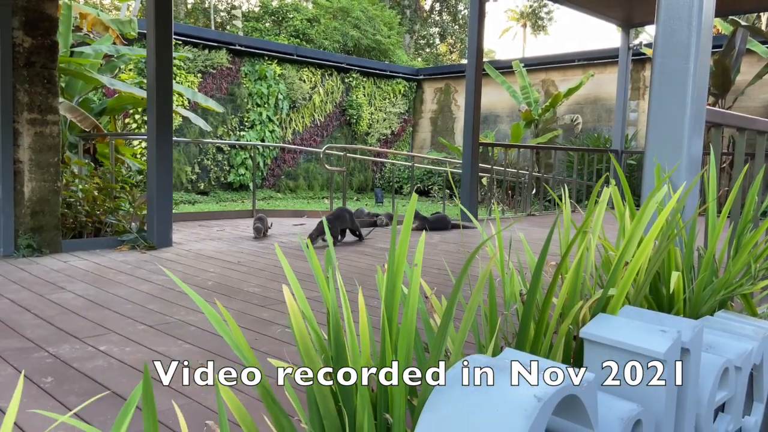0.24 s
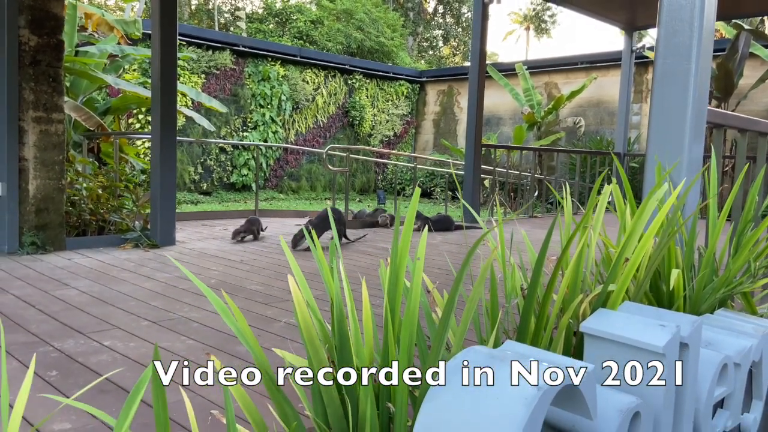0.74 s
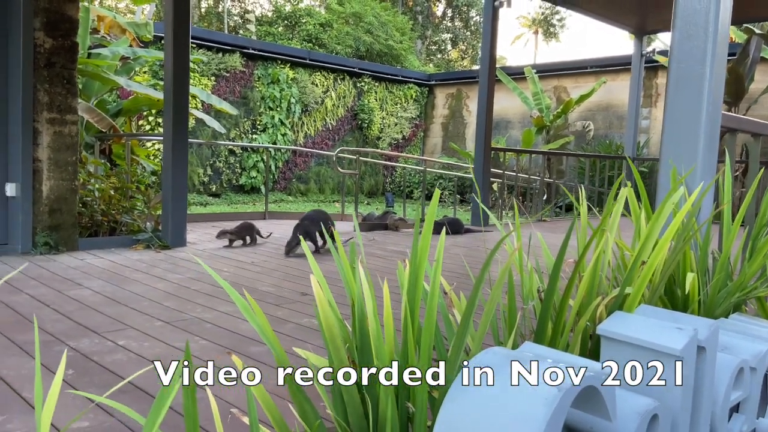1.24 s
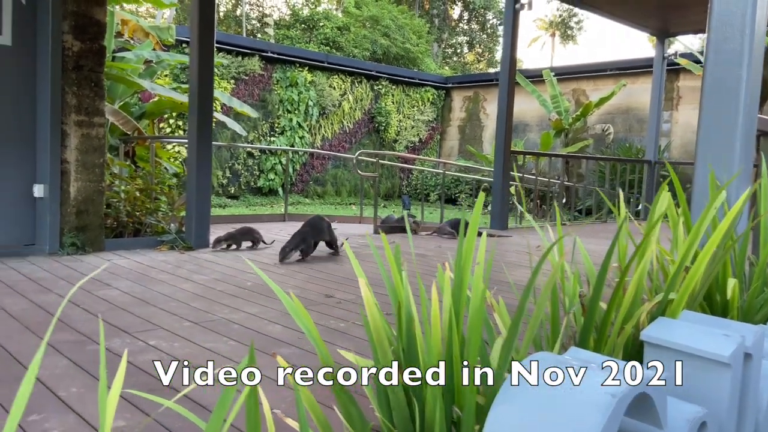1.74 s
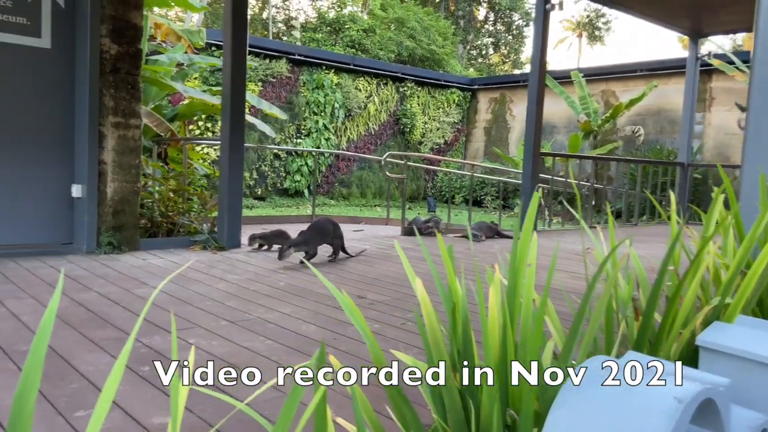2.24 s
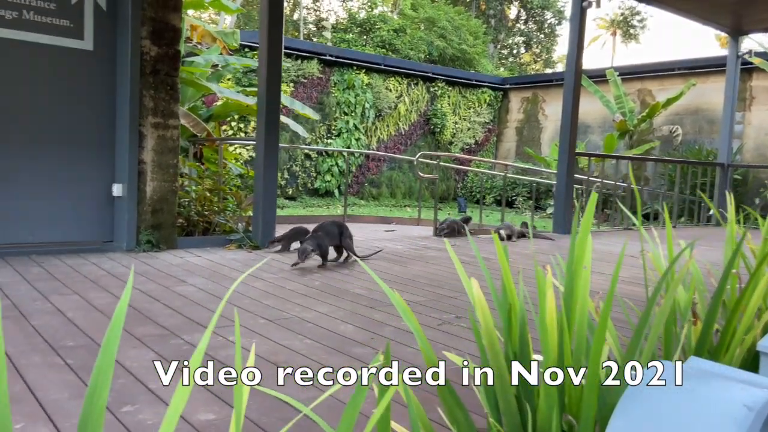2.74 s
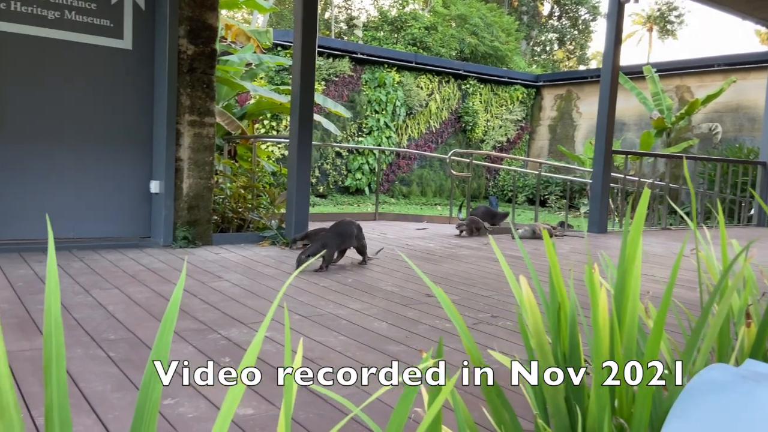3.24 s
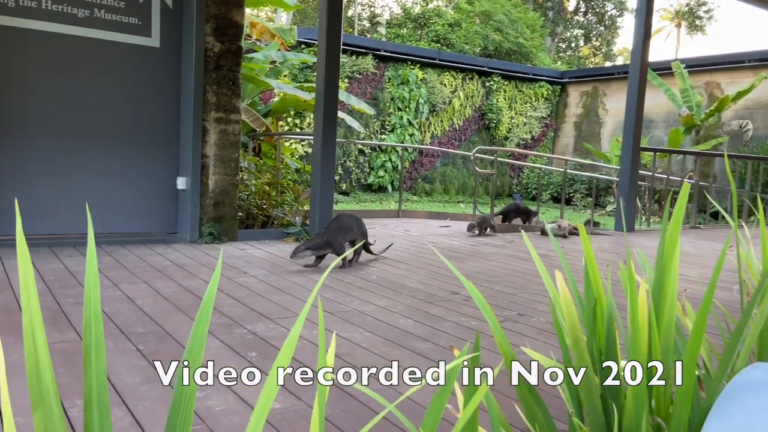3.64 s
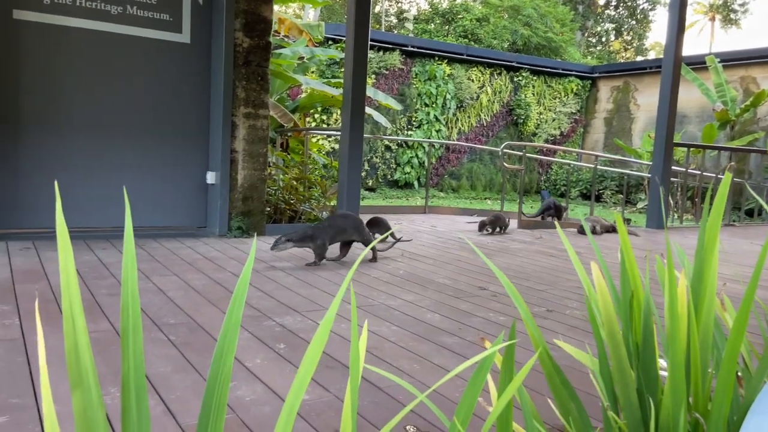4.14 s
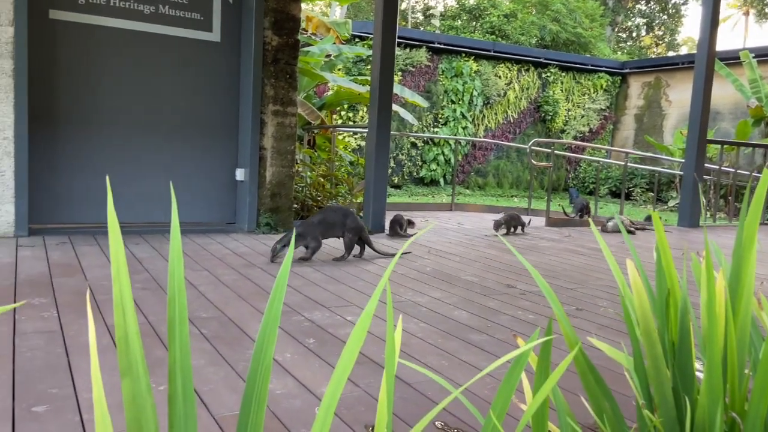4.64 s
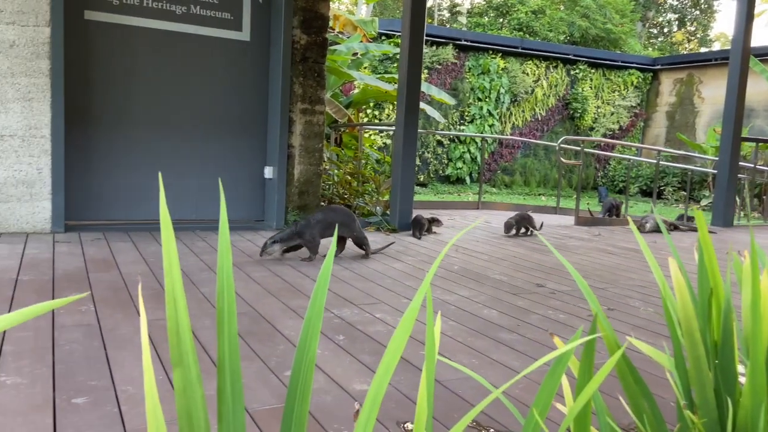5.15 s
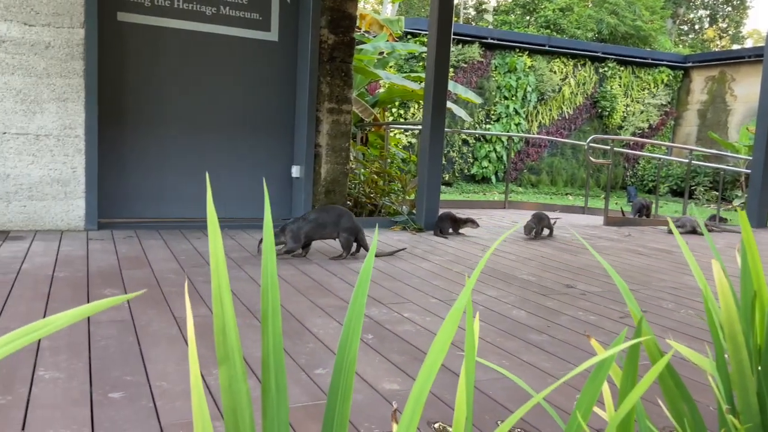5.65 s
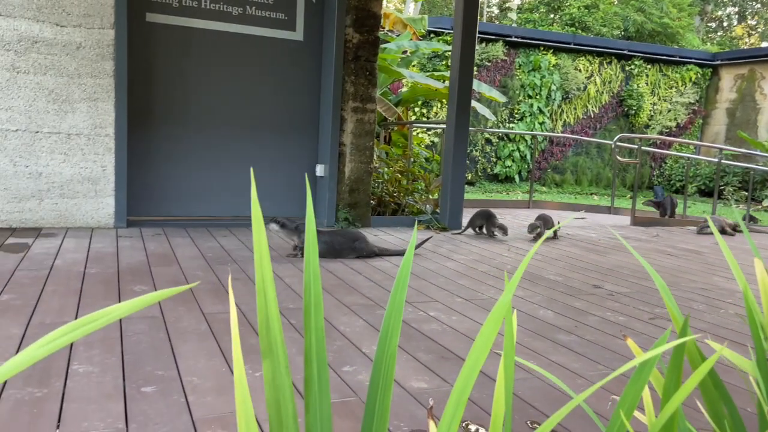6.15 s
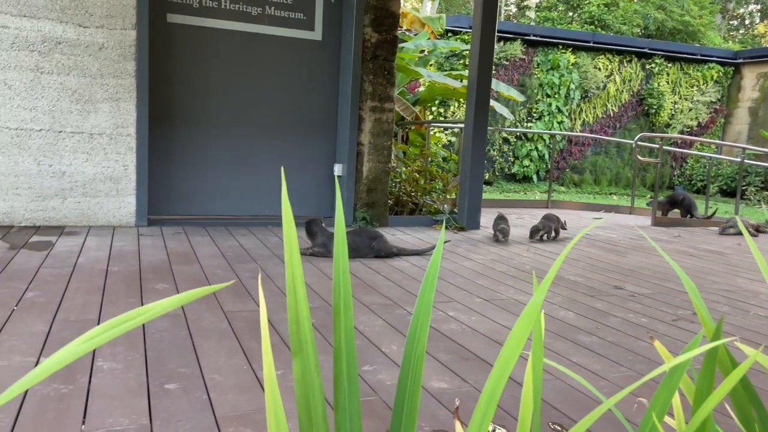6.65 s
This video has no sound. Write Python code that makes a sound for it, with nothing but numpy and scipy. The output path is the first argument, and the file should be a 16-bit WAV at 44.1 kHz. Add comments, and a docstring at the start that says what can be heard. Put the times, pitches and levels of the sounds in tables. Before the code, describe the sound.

On a roofed wooden deck in a garden, a low steady hum of machinery and traffic lies under a soft wash and a faint, very high insect hiss. From 0.1 to 0.8 seconds otters give small chirps and low squeaks, ending in a raspy one. At 1.1 a body flops dully on the boards, with a rising yelp and a falling whistle, then more squeaks to 1.7. A lull follows, with light claw ticks at 2.0 and 2.75 and a lone insect swelling until about 3.3. A tiny squeak and rustle come at 3.0. At 3.5 a softer bump starts a busy cluster of raspy squeaks. Clear falling chirps follow at 4.0, 4.35, 4.85 and 5.15, and a sharp one at 5.5. A distant two-tone horn sounds at 5.6, with a soft shuffle around 5.8. Faint thin peeps continue to 6.3, and a last clear chirp comes at 6.8. Short echoes surround the calls.

```python
"""A family of otters calls on a roofed wooden deck: gliding sines with an octave, from clear chirps to raspy squeaks.
Noise bursts make claw ticks, and ring damped board modes as bodies flop. Walls and roof return decaying noise echoes.
Swelling noise makes a brief rustle and a soft shuffle; a far two-tone horn sounds once, as flickering overtones.
Behind lie coloured noises: a hum of machinery and traffic, a garden wash and a high insect chorus.
One insect hisses off to the side, a wavering high tone."""
import sys
import numpy as np
from scipy import signal
from scipy.fft import rfft, irfft, next_fast_len
from scipy.io import wavfile

SR = 44100
rng = np.random.default_rng(int(sys.argv[2]) if len(sys.argv) > 2 else 0)


def file_out(sig):
    """Save sig as 16-bit WAV at sys.argv[1]."""
    # one column per channel
    cols = np.atleast_2d(sig).T
    # limit, then scale
    lim = np.clip(cols, -1, 1)
    pcm = np.round(lim * 32767).astype(np.int16)
    wavfile.write(sys.argv[1], SR, pcm)


N = 303849


def from_db(db):
    """dB to gain."""
    return 10 ** (np.asarray(db) / 20)


def rms_one(x):
    """Scale to rms 1."""
    return x / np.sqrt(np.mean(x ** 2) + 1e-20)


def level_curve(rows):
    """A (seconds, dB) table as one gain per sample."""
    seconds, db = np.transpose(rows)
    return from_db(np.interp(np.arange(N) / SR, seconds, db))


def at_hz(points, hz):
    """Read a (Hz, dB) table on a log-frequency axis."""
    table_hz, db = np.transpose(points)
    return np.interp(np.log(hz), np.log(table_hz), db)


def drift(rate_hz, size):
    """Random wander of rms 1: noise through a two-pole low-pass at about rate_hz."""
    settle = 8000   # samples dropped while the filter settles
    r = np.exp(-2 * np.pi * rate_hz / SR)
    slow = signal.lfilter([1], [1, -2 * r, r * r], rng.standard_normal(size + settle))
    return rms_one(slow[settle:])


def coloured(spectrum, patchy_db):
    """Noise of rms 1 with the given spectrum; its level flickers by patchy_db."""
    size = next_fast_len(N)
    bin_hz = np.arange(size // 2 + 1) * SR / size + 1   # the 1 keeps the log finite
    shaped = rfft(rng.standard_normal(size)) * from_db(at_hz(spectrum, bin_hz))
    noise = irfft(shaped, size)[:N]
    return rms_one(noise * from_db(patchy_db * drift(26.0, N)))


def band_noise(noise, low_hz, high_hz):
    """Keep a gently sloped band of the noise."""
    return signal.sosfilt(signal.butter(1, [low_hz, high_hz], "band", fs=SR, output="sos"), noise)


def swell(peak_s, peak_db, width_s):
    """A smooth rise and fall of gain, 6 dB down at width_s from the peak."""
    return from_db(peak_db - 6 * ((np.arange(N) / SR - peak_s) / width_s) ** 2)


def placed(x, pan_db):
    """One source to two ears: a level split, and the right ear a little late."""
    lag_s = .00004
    n = np.arange(len(x))
    late = np.interp(n - lag_s * SR, n, x)
    return np.array([x * from_db(pan_db / 2), late * from_db(-pan_db / 2)])


# Hum spectrum. Each row: frequency in Hz, relative density in dB per Hz.
HUM_COLOUR = [(18, -56), (30, -20.5), (46, -10), (59, -4), (75, -5), (92, -5), (108, 3), (119, 0),
              (145, -10), (166, -9.5), (184, -8), (193, -11), (211, -13), (276, -30), (320, -31),
              (420, -51), (700, -120)]
# Hum fader. Each row: time in seconds, level in dB.
HUM_LEVEL = [(0, -33), (1.1, -32.5), (1.8, -33.5), (3.2, -31.5), (3.8, -31), (6.2, -31), (6.89, -32.5)]


def hum():
    """Distant machinery and traffic: low noise shaped into broad peaks."""
    return level_curve(HUM_LEVEL) * coloured(HUM_COLOUR, patchy_db=0.58)


# Wash spectrum. Each row: frequency in Hz, relative density in dB per Hz.
WASH_COLOUR = [(150, -11), (260, -2.5), (309, -6.5), (402, -7), (521, -9.5), (577, -10), (707, -9.5),
               (878, -10), (1320, -18.5), (2880, -23.5), (5530, -35), (7390, -35), (8300, -43),
               (10800, -122), (18300, -120)]
WASH_DB = -51.5


def wash():
    """Far traffic and leaves: steady noise, weaker towards the treble."""
    return from_db(WASH_DB) * coloured(WASH_COLOUR, patchy_db=.3)


# Insect chorus spectrum. Each row: frequency in Hz, relative density in dB per Hz.
CHORUS_COLOUR = [(9000, -79), (9600, -22), (10200, -11.5), (10700, -6), (11100, 2), (11700, -4.5),
                 (12200, -13), (12500, -37), (13500, -49), (16000, -68)]
# Chorus fader. Each row: time in seconds, level in dB.
CHORUS_LEVEL = [(0.0, -66), (0.23, -69), (3.56, -68.5), (3.66, -70.5), (6.21, -69), (6.46, -72.5),
                (6.8, -68)]


def chorus():
    """Insects blend into a narrow band of high hiss."""
    return level_curve(CHORUS_LEVEL) * coloured(CHORUS_COLOUR, patchy_db=.4)


# Spectrum of the wide layer. Each row: frequency in Hz, relative density in dB per Hz.
WIDE_COLOUR = [(18, -50), (30, -26), (48, -27), (74, -14.5), (106, 0), (188, -10.5), (410, -22), (873, -19),
               (1410, -24.5), (3150, -38.5), (4360, -43.5), (6050, -47.5), (7400, -51.5), (11100, -48),
               (12200, -59.5), (15900, -50.5), (22000, -120)]
WIDE_DB = -46.5


def wide_wash():
    """The wide part of the garden: one noise with opposite sign in the two ears."""
    return from_db(WIDE_DB) * coloured(WIDE_COLOUR, patchy_db=.3) * [[1], [-1]]


INSECT_HZ = 12330
# Lone insect fader. Each row: time in seconds, level in dB before the ear gains.
INSECT_LEVEL = [(.8, -93), (1.0, -78), (3.1, -70), (3.35, -94)]


def lone_insect():
    """One insect swells and stops: a high tone multiplied by wandering noise becomes a narrow hiss."""
    tone = np.sqrt(2) * np.sin(2 * np.pi * INSECT_HZ * np.arange(N) / SR)
    hiss = level_curve(INSECT_LEVEL) * drift(250, N) * tone
    return hiss * np.array([[1.05], [-.7]])   # louder in the left ear, inverted in the right


def background():
    """Hum, wash and chorus sit near the centre, amid the wide layer and the lone insect."""
    common = hum() + wash() + chorus()
    leaning_right = common * from_db([[-.55], [.55]])
    return leaning_right + wide_wash() + lone_insect()


HORN_S, HORN_LENGTH_S = 5.575, 0.41   # start and length
# Horn partials. Each row: note pitch in Hz, multiple of it, level in dB before the flicker and fades,
# gain in the right ear (negative inverts).
HORN_PARTIALS = [(528, 2, -63, .5), (528, 3, -58, .3), (528, 4, -68, .5), (450, 3, -64, -.4),
                 (450, 6, -70, .5)]


def horn():
    """Only overtones of the two notes carry this far, each with its own flicker and ear balance."""
    out = np.zeros((2, N))
    s = np.arange(round(HORN_LENGTH_S * SR)) / SR
    start = round(HORN_S * SR)
    unsteady = 1 + .004 * drift(25, len(s))   # pitch waver shared by all partials
    phase_per_hz = 2 * np.pi * np.cumsum(unsteady) / SR
    fades = np.minimum(s / .03, 1) * (1 - s / HORN_LENGTH_S) ** .4
    for hz, multiple, db, right_gain in HORN_PARTIALS:
        flicker = from_db(db + 3 * drift(20, len(s)))
        partial = np.sqrt(2) * flicker * fades * np.sin(multiple * hz * phase_per_hz)
        out[:, start:start + len(s)] += partial * [[1], [right_gain]]
    return out


def rustle():
    """A short swell of bright noise, own in each ear."""
    noise = band_noise(rng.standard_normal((2, N)), 2800, 9000)
    return swell(peak_s=3.035, peak_db=-59, width_s=.022) * noise   # peak level before the band filter


# Shuffle spectrum. Each row: frequency in Hz, relative density in dB per Hz.
SHUFFLE_COLOUR = [(500, -35), (900, 3.5), (1500, 6), (2200, -17), (3200, -10), (4200, -48)]


def shuffle():
    """A soft shuffle: patchy mid-range noise swells, own in each ear."""
    ears = np.array([coloured(SHUFFLE_COLOUR, patchy_db=2.5) for _ in range(2)])
    return swell(peak_s=5.77, peak_db=-57.5, width_s=0.23) * ears


# Claws on the boards. Each row: start in seconds, noise level in dB before the band filter.
CLAW_TICKS = [(2.0, -62), (2.752, -48), (3.479, -53), (5.151, -60), (5.53, -59)]


def ticks():
    """Each tick is a burst of bright noise, little over a hundredth of a second long, with a sharp start and a decay."""
    out, t = np.zeros(N), np.arange(600) / SR
    for start, db in CLAW_TICKS:
        burst = rng.standard_normal(len(t)) * np.exp(-t / 0.011)
        out[round(start * SR):][:len(t)] += from_db(db) * burst
    return band_noise(out, 2600, 9000)


# Bodies flop on the boards. Each row: start in seconds, level in dB before the push trim.
BODY_THUMPS = [(1.104, -27.5), (3.467, -35)]
PUSH_TRIM_DB = -36.5
# Deck modes. Each row: frequency in Hz, gain in dB, time to ring down 60 dB in seconds.
DECK_MODES = [(187, 1, 0.045), (319, -3.5, 0.027), (460, -1.5, 0.02), (590, -2.5, 0.024), (810, -29, 0.035)]


def thumps():
    """A soft, ragged contact of about a tenth of a second rings the damped modes of the boards."""
    push = np.full((2, N), 1e-18)   # a trace of signal, not exact silence
    t = np.arange(9000) / SR
    contact = np.exp(-t / 0.096) * (1 - np.exp(-t / 0.008))
    for start, db in BODY_THUMPS:
        common, left, right = rng.standard_normal((3, len(t)))
        ears = common + 0.92 * np.array([left, right])   # the broad deck differs between the ears
        push[:, round(start * SR):][:, :len(t)] += from_db(db + PUSH_TRIM_DB) * ears * contact
    out = 0
    for hz, db, t60 in DECK_MODES:
        r = from_db(-60 / (t60 * SR))   # decay per sample
        w = 2 * np.pi * hz / SR
        out = out + signal.lfilter([0, from_db(db) * np.sin(w)], [1, -2 * r * np.cos(w), r * r], push)
    return out


# What the surfaces return. Each row: frequency in Hz, gain in dB.
ECHO_COLOUR = [(300, 3.5), (1000, -0.5), (1800, -3), (2800, 1), (3600, 5), (4600, 4.5), (7000, 5.5)]
# Each row: time to die 60 dB in seconds, level in dB, gap before it starts in seconds.
REFLECTIONS = [
    (0.06, 1.5, .002),    # boards, posts and rail close to the animals
    (0.44, -5, 0.014),    # walls and roof
]
ECHO_SHARED = 0.5     # share of the echo power that both ears hear alike
AIR_LOSS_HZ = 5400    # above this the tail dies sooner


def echoes(x):
    """Convolve with dying noise: quick near reflections, then a dense tail, partly different in the two ears."""
    t, tail = np.arange(SR) / SR, 0
    colour = from_db(at_hz(ECHO_COLOUR, np.arange(SR // 2 + 1) + 1))
    air_loss = signal.butter(2, AIR_LOSS_HZ, fs=SR, output="sos")
    for t60, db, gap in REFLECTIONS:
        left, right, shared = rng.standard_normal((3, SR))
        noise = np.sqrt(ECHO_SHARED) * shared + np.sqrt(1 - ECHO_SHARED) * np.array([left, right])
        noise = irfft(rfft(noise) * colour, SR)
        dull = signal.sosfilt(air_loss, noise)
        treble = (noise - dull) * from_db(-80 * t / t60)   # extra decay on top of the common one
        decay = from_db(-60 * t / t60)
        part = (dull + treble) * decay * (t > gap)
        tail = tail + from_db(db) * part / np.sqrt(np.sum(decay ** 2))
    return signal.fftconvolve(x, tail, axes=1)[:, :N]


# Throat colour of the tone. Each row: pitch of the tone in Hz, gain in dB.
THROAT = [(400, 2), (1100, 3), (1400, -0.5), (1750, 2), (2600, -7.5), (3200, -2), (3600, -0.5), (4300, 1),
          (5000, 0), (7000, -0.5)]
# Throat colour of the octave. Each row: pitch of the octave in Hz, gain in dB.
OCTAVE_THROAT = [(800, -0.5), (5800, -8.5), (6600, -2), (7500, -1.5), (8500, -16.5), (9800, -5),
                 (11000, -8), (14000, -3)]
CALL_ATTACK_S, CALL_RELEASE_S = 0.0096, 0.013
CALL_EDGE_DB = -8   # the attack starts, and the release ends, this far under the call's level
PITCH_WANDER = .017   # uneven steps in the glide, as a share of the pitch


def call(start, length, first_hz, last_hz, bend, db, swell_db, octave_db, rasp):
    """A whistle: a gliding near sine with its octave, coloured by the throat; rasp shakes pitch and strength."""
    s = np.arange(round(length * SR)) / SR
    progress = s / length
    glide = progress ** bend if bend >= 1 else 1 - (1 - progress) ** (1 / bend)

    shake, wander = drift(200, len(s)), drift(35, len(s))
    shake_depth = .02 * rasp + .045 * rasp ** 2
    hz = first_hz + (last_hz - first_hz) * glide
    hz = hz * (1 + shake_depth * (shake - shake.mean()))
    hz = hz * (1 + PITCH_WANDER * (wander - wander.mean()) * glide ** .5)   # grows along the glide

    phase = 2 * np.pi * np.cumsum(hz) / SR
    tone = from_db(at_hz(THROAT, hz)) * np.sin(phase)
    octave = from_db(octave_db + at_hz(OCTAVE_THROAT, 2 * hz)) * np.sin(2 * phase)

    fade = np.clip(1 - np.minimum(s / CALL_ATTACK_S, (length - s) / CALL_RELEASE_S), 0, 1)
    edges = np.clip(np.minimum(s, length - s) / 0.0013, 0, 1)   # soft start and end
    roughness_db = (1 + 3 * rasp) * drift(99, len(s))
    level_db = db + swell_db * progress + CALL_EDGE_DB * fade + roughness_db
    return round(start * SR) + np.arange(len(s)), np.sqrt(2) * (tone + octave) * edges * from_db(level_db)


# The calls. Each row: start in seconds, length in seconds, first pitch in Hz, last pitch in Hz,
# bend (under 1 the glide comes early, over 1 late), level in dB before throat and fades,
# level change towards the end in dB, octave in dB before its throat colour, left minus right in dB,
# rasp (0 clear whistle to 1 coarse squawk).
OTTER_CALLS = [ (0.09, 0.064, 3700, 3040, 2.3, -66, 6.5, -7, -0.5, 0.4),
               (0.166, 0.09, 1380, 894, 0.83, -56.5, -8, -7, -1, .3),
               (0.334, 0.012, 630, 645, 0.9, -45, -2, -29, -1, 0.3),
               (0.449, 0.053, 3800, 3720, 1., -72.5, -1, -20, 3, 0.62),
               (0.451, 0.079, 1257, 1180, 2.2, -62, 0, -27, 1, .4),
               (0.521, 0.054, 1088, 686, .6, -59, 3.5, -25, 3, 0.4),
               (0.531, 0.024, 2000, 1745, .8, -58, 7, -30, 0, 0.67),
               (0.643, 0.075, 5110, 3370, 1.08, -58, 3, -7, 3, 0.24),
               (0.733, 0.04, 1773, 1254, 0.48, -43.5, -1, -30, -0.5, 0.7),
               (1.165, 0.11, 468, 1254, 3.2, -45.5, -12, -20, -2, 0.4),
               (1.241, 0.084, 4636, 2280, 2.3, -49, -4, -7, 4, 0.36),
               (1.32, 0.027, 2200, 1656, 0.26, -47, 5.5, -23, 0, 0.53),
               (1.331, 0.024, 1500, 1057, 0.3, -48, -1, -25, .5, 0.69),
               (1.597, 0.043, 5070, 4250, 0.88, -69, -9, -25, .5, 0.63),
               (1.594, 0.039, 3800, 3250, 0.86, -65, -5, -21, .5, 0.57),
               (1.595, 0.063, 1333, 975, 0.83, -55, 0.5, -16, 0, 0.4),
               (1.639, 0.037, 597, 480, 1.07, -40.5, -18, -27, 0, 0.32),
               (2.993, 0.045, 7300, 4300, .8, -56, -9, -20, 5, 0.9),
               (3.46, 0.091, 5320, 3335, 1.06, -57.5, 4.5, -16, 1.5, 0.28),
               (3.468, 0.059, 451, 458, 1.1, -52.5, -4.5, 0, -4, 0.68),
               (3.557, 0.026, 1903, 1040, 1.9, -47.5, 0, -29, 2, 0.56),
               (3.629, 0.016, 730, 804, 1., -52, 1, -22, -1, 0.46),
               (3.643, 0.0486, 1245, 1535, 0.59, -53.5, 0.5, -11, .5, 0.99),
               (3.645, 0.024, 2340, 2740, 0.65, -52, 2, -10, 0, 0.6),
               (3.688, 0.04, 4100, 2600, .6, -43, -6, -22, 1, 0.6),
               (3.694, 0.03, 4200, 3600, .9, -50, -3, -25, 1.5, 0.85),
               (3.701, 0.03, 764, 780, 1., -52, -8, -22, 2, .7),
               (4.035, 0.094, 4994, 1910, 4.6, -51, 3, -4, 2.5, 0.13),
               (4.126, 0.019, 1930, 1645, 0.3, -47, -7, -25, 0, .4),
               (4.327, 0.042, 4110, 3327, 0.37, -45, 8.5, -23, 0.5, 0.24),
               (4.361, 0.0392, 3730, 3464, 0.49, -40.5, -2.5, -20, 2.5, 0.41),
               (4.806, 0.028, 1245, 2094, 0.59, -59, -2, -24, .5, 0.67),
               (4.818, 0.011, 7040, 7000, 1., -64, 0, -20, 13., .4),
               (4.853, 0.019, 6840, 6800, 1.4, -37, -8, -20, 1, 0.35),
               (5.142, 0.108, 5090, 2950, 2.2, -59.5, 3.5, -3.5, 2.5, 0.3),
               (5.278, 0.041, 1480, 1044, 1.09, -51.5, -7, -26, 1, 0.65),
               (5.524, 0.042, 3317, 2830, 0.91, -40, -12, -15, -0.5, 0.28),
               (5.578, 0.025, 3700, 3450, 1.1, -65, -2, -20, 0, 0.7),
               (5.899, 0.064, 4530, 4120, 0.093, -60.5, 4.5, -6, 6, 0.22),
               (5.958, 0.047, 3910, 3730, 0.6, -58.5, -5, -15, -1, 0.65),
               (6.008, 0.09, 3206, 3050, 1.34, -65, 1, -25, 2, 0.44),
               (6.22, 0.12, 2800, 2770, 0.96, -63, -4, -24.5, 2, .2),
               (6.326, 0.018, 3900, 3600, .7, -64, 0, -20, 1, .7),
               (6.826, 0.08, 5290, 4460, 2.1, -51, 7, -6, 3.5, 0.17), ]


def otters():
    """All chirps, squeaks and peeps, each from its place."""
    out = np.zeros((2, N + SR))   # spare room at the end
    for *shape, pan_db, rasp in OTTER_CALLS:
        where, whistle = call(*shape, rasp)
        out[:, where] += placed(whistle, pan_db)
    return out[:, :N]


def scene():
    """Otters, thumps and horn with their echoes, over the dry small noises and the garden."""
    echoing = otters() + thumps() + horn()
    small_noises = placed(ticks(), 1.1) + rustle() + shuffle()
    return echoing + echoes(echoing) + small_noises + background()


def record(dry):
    """The small microphones lose the deepest bass; a steep low-pass cuts the top."""
    thin = signal.sosfilt(signal.butter(3, 34, "high", fs=SR, output="sos"), dry)
    top_hz = 15700   # from here up, 70 dB down
    return signal.sosfilt(signal.cheby2(12, 70, top_hz, fs=SR, output="sos"), thin)


dry = scene()
out = record(dry)
file_out(out)
```